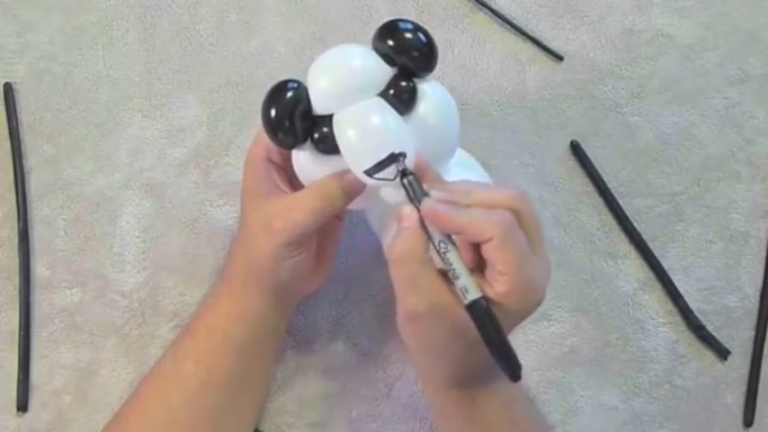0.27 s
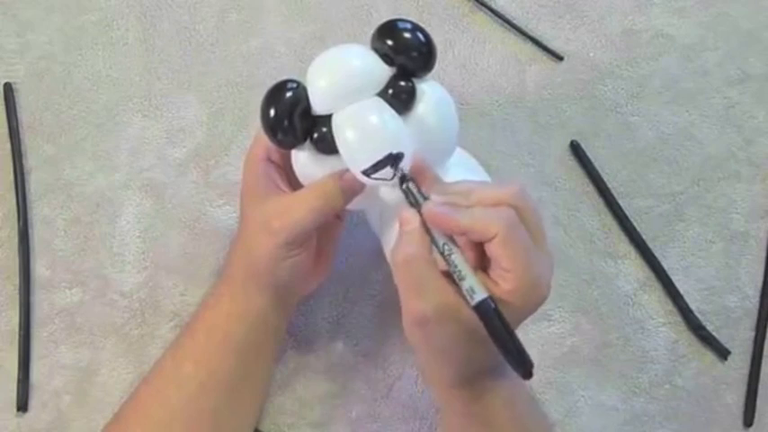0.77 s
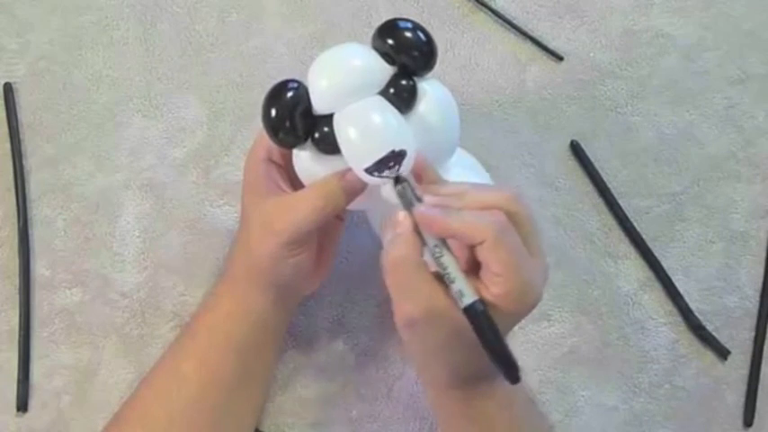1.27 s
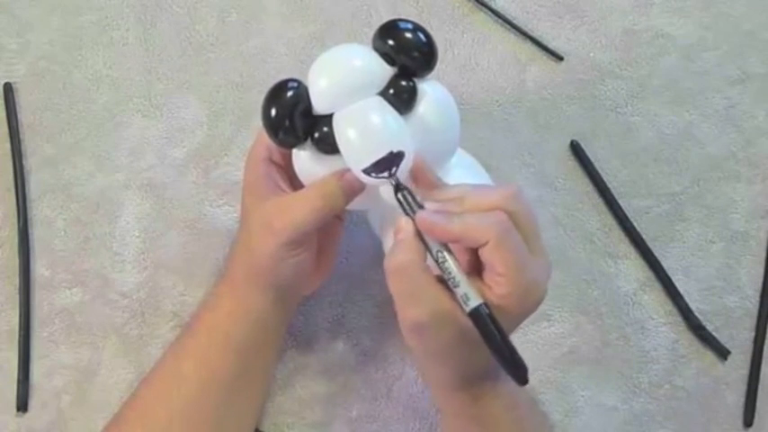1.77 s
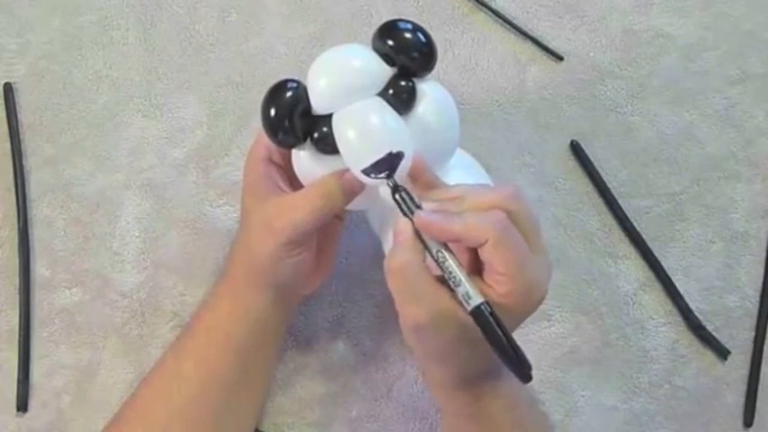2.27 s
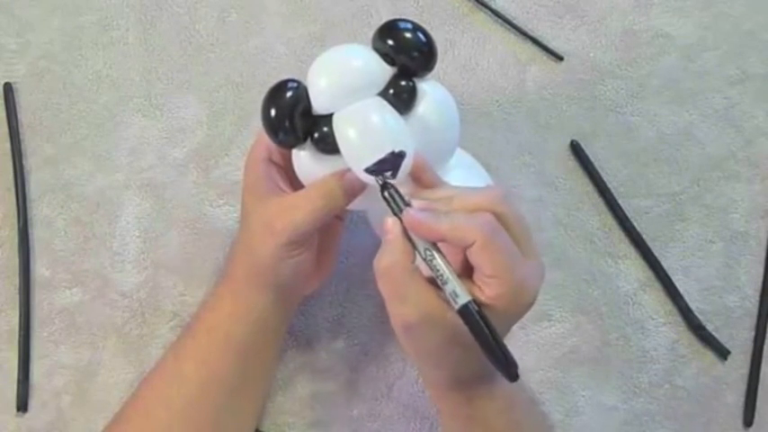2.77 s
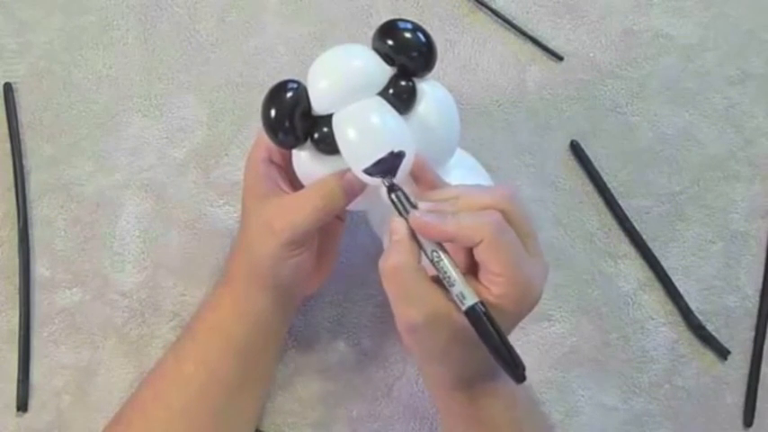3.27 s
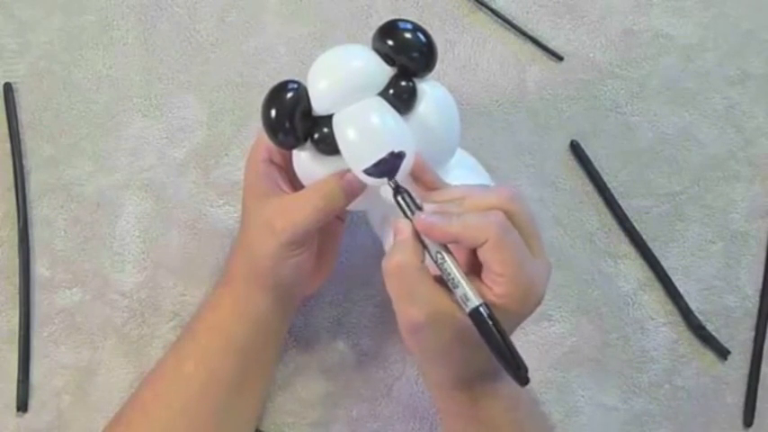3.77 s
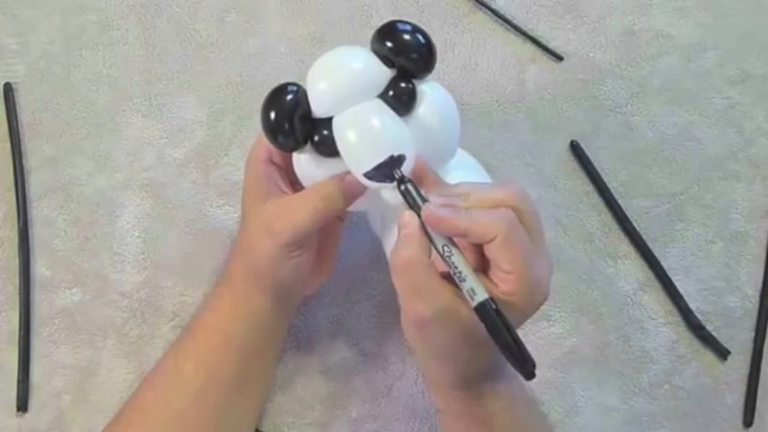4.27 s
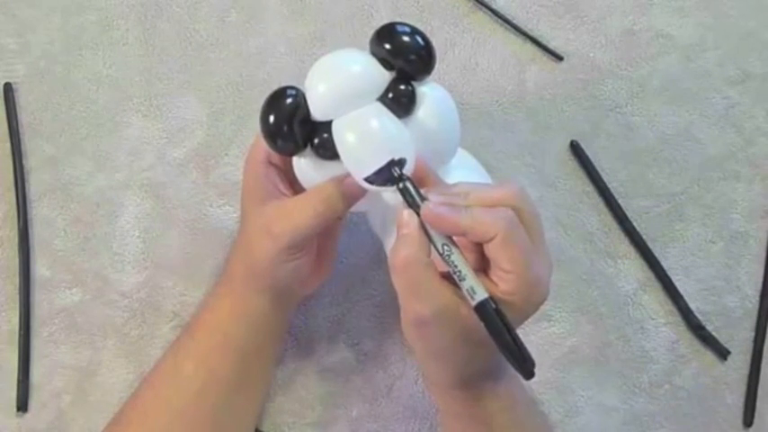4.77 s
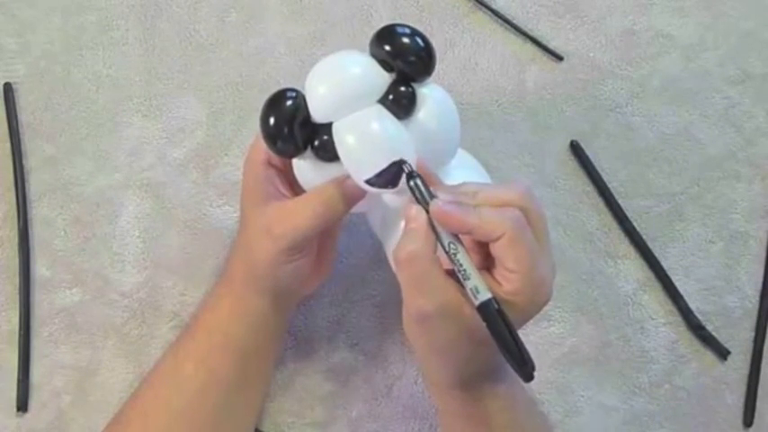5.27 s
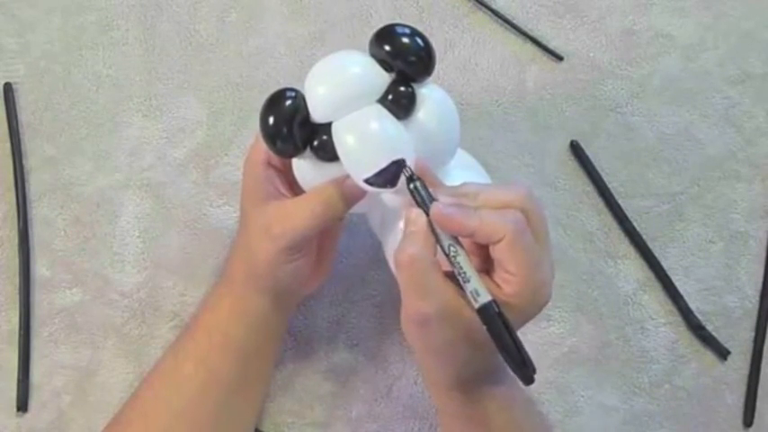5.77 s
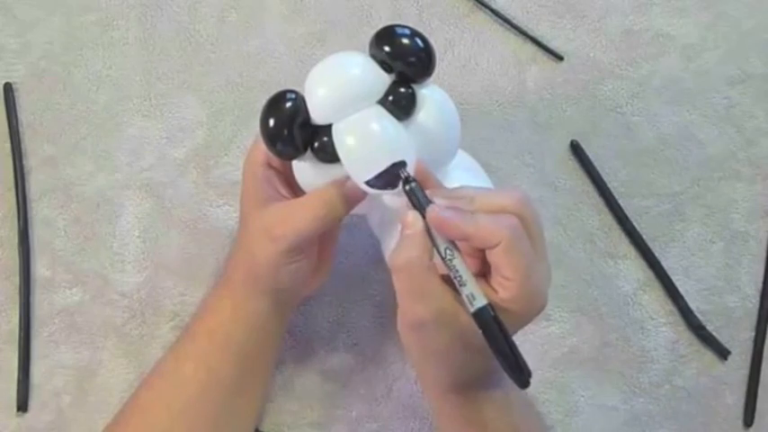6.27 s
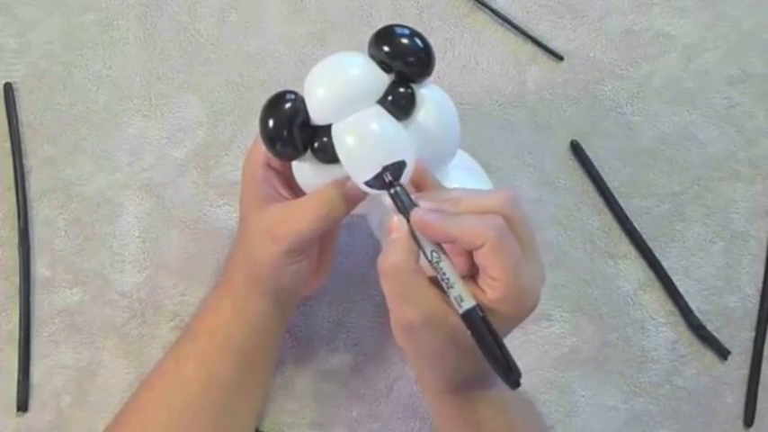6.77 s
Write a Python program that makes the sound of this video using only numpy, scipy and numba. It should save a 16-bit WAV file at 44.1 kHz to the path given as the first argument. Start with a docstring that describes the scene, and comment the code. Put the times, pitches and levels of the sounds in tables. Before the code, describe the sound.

Close up, a marker tip sticks and slips on a balloon in a rapid run of rubbery squeaks, each bending in pitch. The strokes sink into slower creaks, and the last three seconds hold mostly gentle wipes over wet ink and small, hollow taps on the skin. The microphone sounds slightly dull, and the small indoor room adds brief reflections and a faint, low hush.

```python
"""Felt marker on a balloon

Close up in a small room, on one narrow-band microphone: a marker colours a hand-held latex balloon.
The tip sticks and slips, ringing the skin and the air inside: slow slips creak, fast ones lock and squeak.
Each push is one arch of the hand, mostly loudest and purest at its crest, rougher as it lands and eases off.
Later, on the ink-wet patch, come mostly soft drags and ticks, with one faint falling chirp."""
import sys
import numpy as np
from scipy import signal
from scipy.fft import rfft, irfft, next_fast_len
from scipy.io import wavfile
from scipy.ndimage import uniform_filter1d, map_coordinates
from numba import njit

SR = 44100
rng = np.random.default_rng(int(sys.argv[2]) if len(sys.argv) > 2 else 0)


def dump_mix(stems):
    """Bounce the given channels to the path in sys.argv[1] as a 16-bit WAV at rate SR."""
    frames = np.atleast_2d(stems).T  # one column per channel
    limited = np.clip(frames, -1, 1)  # hard clip at full scale
    pcm = np.round(limited * 32767).astype(np.int16)
    wavfile.write(sys.argv[1], SR, pcm)


N = 309096
TIME = np.arange(N) / SR

# room tone spectrum: frequency_hz, relative_db
ROOM_TONE = [(20, -6), (50, -5.5), (120, 3.5), (200, 3.5), (450, -1.5), (900, -6), (3000, -17), (7000, -21),
             (8000, -48)]
# time the walls take to die away by 60 dB: frequency_hz, decay_s
ROOM_DECAY = [(200, 0.46), (1000, 0.31), (4000, 0.32), (8000, 0.18)]
# what the stretched skin radiates after one slip: frequency_hz, gain_db
SKIN_SPECTRUM = [(80, -54), (200, -19), (340, -5.5), (540, -7.5), (720, 2.5), (950, 0.5), (1400, -2.5),
                 (2100, -5.5), (3000, -8.5), (4100, -8.5), (6500, -19.5), (8000, -35)]
# modes of the skin under the tip: pitch_ratio, q, gain_db
PATCH_MODES = [(0.999, 5.1, -1), (2.298, 6.3, -13.5), (3.501, 12, -37)]
# resonances of the air inside the balloon: pitch_hz, over_skin_db
AIR_MODES = [(415, 4), (573, -19.5), (706, -6), (838, -1.5), (1175, -1.5), (1311, -14.5), (1402, -15.5),
             (1691, -0.5), (1872, -3), (2245, -0.5), (2826, 1.5)]
# dull colour of a wet tip letting go softly: frequency_hz, gain_db
WET_COLOUR = [(200, 0.5), (900, -2), (1400, -4), (2500, -8), (7000, -19.5)]
# colour of a touch, which also pushes the skin as a whole: frequency_hz, gain_db
TOUCH_COLOUR = [(150, 7), (400, 9), (900, 5), (3000, 6), (7000, 8)]
# wipes of the tip over wet ink: start_s, length_s, level_db
WET_WIPES = [(4.71, .016, -40), (4.845, 0.013, -35), (4.894, 0.044, -37), (4.94, 0.078, -40),
             (5.042, 0.03, -39.5), (5.082, 0.072, -36), (5.167, 0.064, -42.5), (5.548, 0.022, -52),
             (5.946, 0.054, -42.5), (6, 0.038, -33), (6.04, 0.093, -53), (6.145, 0.038, -43),
             (6.413, 0.12, -39.5), (6.676, 0.088, -44.5), (6.767, 0.047, -44), (6.814, 0.095, -43.5),
             (6.915, .1, -52)]
# single touches and releases of the tip: start_s, peak_db, relative_treble_db
TIP_TOUCHES = [(0.119, -16, -15), (1.081, -23, -13), (1.944, -21.5, -9), (2.238, -27, 2),
               (3.854, -24.5, -16.5), (3.881, -28, -13), (4.373, -23.5, -13.5), (4.568, -23, -10),
               (4.588, -25, -15.5), (4.625, -22.5, -9.5), (4.682, -28, -27), (4.715, -18.5, -14.5),
               (4.848, -24, -13.5), (5.295, -32.5, -17), (5.385, -31.5, -14), (5.399, -32, -16),
               (5.615, -29.5, -12), (5.782, -34.5, -12.5), (5.964, -37, 4), (5.979, -31.5, 8),
               (6.048, -28.5, -6), (6.089, -30.5, -24), (6.107, -29, -6), (6.146, -31, -15),
               (6.431, -29, -21), (6.519, -30.5, -18), (6.641, -34, -10), (6.699, -29.5, -10),
               (6.833, -27.5, -11), (6.897, -32.5, -2), (6.937, -32.5, -7), (6.979, -30, -6.5)]
# squeaks and creaks of the tip on latex: start_s, gather_s, ease_s, first_slip_hz, crest_slip_hz,
# last_slip_hz, crest_db, fade_db, crest_roughness (0-1), first_skin_hz, last_skin_hz
SQUEAK_STROKES = [ (0.0, .039, 0.015, 576, 701.3, 663, -22, 6, .05, 1150, 620),
                  (0.068, 0.022, .012, 677, 677, 680, -33, 4, 0.3, 800, 640),
                  (0.134, .08, .048, 614.3, 573.5, 489, -24, 4.5, 0.15, 1300, 1290),
                  (0.262, .01, .025, 459, 438.4, 390, -26.5, 2.5, 0, 950, 850),
                  (0.295, .035, 0.041, 304, 311.3, 282, -29.5, 9, 0.14, 1100, 980),
                  (0.443, 0.011, 0.0074, 299, 398, 444, -30.5, -1.5, 0.4, 1390, 1340),
                  (0.46, .022, .046, 537, 725.6, 422, -23, 7.5, .25, 1380, 1123),
                  (0.569, 0.015, 0.013, 680, 712, 680, -23, 9, .2, 1350, 1240),
                  (0.595, 0.0051, 0.056, 640, 634.7, 607, -25, 12.5, 0.1, 1100, 900),
                  (0.692, 0.056, .034, 588.4, 682, 398, -24.5, 5, 0.08, 1300, 1050),
                  (0.818, 0.02, 0.043, 590, 749, 635, -24, 14, .25, 1480, 1260),
                  (0.902, 0.023, 0.013, 653, 721, 627, -24, 6, 0.4, 1325, 1375),
                  (0.939, 0.032, 0.045, 600, 670, 591, -22, 8, 0.14, 1230, 1250),
                  (1.099, .02, 0.059, 440, 790, 396, -26.5, 10, 0.7, 1400, 980),
                  (1.225, 0.025, 0.0087, 362, 490, 514, -24.5, -3, 0.1, 1310, 1410),
                  (1.255, 0.036, .034, 609, 688.7, 559, -22.5, 6, 0.12, 1243, 1163),
                  (1.33, .04, 0.013, 293, 197.6, 185, -32, 2.5, 0.7, 1150, 1026),
                  (1.439, 0.013, .03, 383.6, 465, 517, -28.5, -5, 0.3, 1020, 1185),
                  (1.483, .024, 0.043, 588, 653.6, 505, -21.5, 16.5, 0, 1320, 1290),
                  (1.573, .032, .047, 437, 659.5, 332, -24, 5, 0.27, 1220, 1030),
                  (1.689, .04, 0.034, 299.5, 589.5, 303.7, -22, 10, .2, 1450, 1140),
                  (1.811, .032, .038, 578, 729.7, 628, -21, 11.5, 0.3, 1550, 855),
                  (2.001, 0.042, 0.049, 397.3, 663, 290, -22, 5, .08, 1340, 1300),
                  (2.238, .003, 0.012, 419, 424, 250, -28.5, 7, 0.8, 1430, 1340),
                  (2.293, 0.021, 0.079, 373, 549, 622, -28, 5.5, .5, 1280, 1330),
                  (2.394, .02, 0.084, 398, 379.8, 204, -30, 3, 0.8, 1060, 1120),
                  (2.639, .037, 0.037, 237.4, 396.8, 301, -31, 3, 0.3, 1280, 964),
                  (2.766, .022, .012, 336.6, 407, 497, -30, -1, 0.7, 1000, 1050),
                  (2.803, .01, .036, 569, 590.4, 556, -26, -1, 0.1, 1170, 1210),
                  (2.85, .016, .013, 557, 584, 547, -21.5, 4.5, 0, 1230, 1170),
                  (2.878, .006, .04, 458, 405.6, 277, -22.5, 10.5, 0.4, 1050, 1180),
                  (2.999, 0.014, 0.049, 456, 647, 369, -25, 9.5, .3, 1170, 1160),
                  (3.097, 0.0079, .014, 380, 478, 456, -29, -1, 0.4, 1020, 1080),
                  (3.122, .01, .062, 436, 415, 129.5, -24.5, 6, 0.5, 860, 990),
                  (3.201, 0.031, 0.033, 304, 333, 321.4, -29, -1, .7, 1480, 1210),
                  (3.268, .024, .023, 524.4, 610, 379, -23, 5.5, .3, 1050, 1140),
                  (3.315, 0.008, 0.055, 397.5, 392, 200.2, -31.5, 1.5, .6, 1160, 1014),
                  (3.58, .003, 0.033, 318, 301.7, 306.4, -30, 2.5, 0.1, 1400, 1390),
                  (3.613, .02, 0.047, 403, 477, 259.7, -30.5, 3, 0.23, 1200, 980),
                  (3.672, .028, 0.032, 218.6, 151, 114.4, -33, 5.5, .35, 1280, 980),
                  (3.899, .027, 0.05, 96.8, 192.3, 90, -29.5, 7, .4, 980, 1030),
                  (3.987, .047, .006, 120.2, 221.3, 231, -30, -6, 0.3, 1000, 1200),
                  (4.043, .055, 0.071, 245.7, 427, 447, -25, 10, 0.3, 1370, 1330),
                  (4.178, .016, 0.023, 391, 568.4, 738, -39, 8, .3, 1140, 1230),
                  (4.682, 0.018, 0.036, 249.3, 238.6, 205, -38.5, 6, .6, 1300, 1250),
                  (5.904, 0.014, 0.013, 650, 591, 374, -42.5, -1, 0.18, 1300, 950), ]


def amp(db):
    """Decibels to gain."""
    return 10 ** (np.asarray(db) / 20)


def unit(x):
    """Scale to rms 1."""
    return x / np.sqrt(np.mean(x ** 2) + 1e-20)


def along(points, hz):
    """Read (frequency_hz, value) points on a log axis."""
    frequencies, values = np.transpose(points)
    return np.interp(np.log(hz + 1), np.log(frequencies), values)


def filtered(x, response):
    """Shape x by a gain that depends on frequency."""
    size = next_fast_len(len(x) + SR // 20)
    return irfft(rfft(x, size) * response(np.fft.rfftfreq(size, 1 / SR)), size)[:len(x)]


def through(x, response):
    """Play x through an impulse response."""
    return signal.fftconvolve(x, response)[:len(x)]


def pulses(times, sizes, count):
    """Band-limited impulses placed between samples."""
    at = times[:, None] * SR
    taps = np.floor(at).astype(int) + np.arange(-7, 9)
    shape = np.sinc(taps - at) * np.cos(np.pi * (taps - at) / 16) ** 2
    return np.bincount(np.clip(taps, 0, count - 1).ravel(), (sizes[:, None] * shape).ravel(), count)


def treble(hz, corner_hz=2300):
    """A weight rising from 0 to 1 around the corner."""
    return 1 - 1 / (1 + (hz / corner_hz) ** 4)


def room_tone(level_db=-52.5):
    """The steady low noise of the still room, behind everything."""
    noise = filtered(rng.standard_normal(N), lambda hz: amp(along(ROOM_TONE, hz)))
    return amp(level_db) * unit(noise)


def wall_reflections(x, wet_db=-9, predelay_s=.004):
    """Near walls answer just after the direct sound, each frequency dying at its own speed."""
    hz, t, spectrum = signal.stft(rng.standard_normal(SR // 2), SR, nperseg=256)
    decay = amp(-60 * t / along(ROOM_DECAY, hz)[:, None])
    tail = signal.istft(spectrum * decay, SR, nperseg=256)[1]
    tail /= np.linalg.norm(tail)
    return amp(wet_db) * through(x, np.pad(tail, (int(predelay_s * SR), 0)))


def balloon_body(contact_db, air_width_hz=33, ripple_delay_s=.00181, size=4096):
    """The answer to one slip: the contact's colour, the damped skin and the ringing air inside."""
    hz = np.fft.rfftfreq(size, 1 / SR)
    cepstrum = irfft(np.log(amp(along(SKIN_SPECTRUM, hz) + contact_db(hz))))
    cepstrum[1:size // 2] *= 2  # causal: nothing sounds before the slip
    cepstrum[size // 2 + 1:] = 0
    skin = np.exp(rfft(cepstrum))
    loss = 1j * hz * air_width_hz
    air = sum(amp(db) * loss / (pitch_hz ** 2 - hz ** 2 + loss) for pitch_hz, db in AIR_MODES)
    # long ripples drag more air and run slower, so the low notes of a slip arrive last
    delay_s = ripple_delay_s / (1 + hz / 2200)
    lag = np.exp(-2j * np.pi * np.cumsum(delay_s) * SR / size)
    return irfft(skin * (1 + air) * lag)


@njit
def resonate(x, step, damping):
    """A resonator with gain 1 at its peak, which moves with step (radians per sample)."""
    out = np.zeros(len(x))
    place = speed = 0.0
    for i in range(len(x)):
        speed += step[i] * (damping * (x[i] - speed) - place)
        place += step[i] * speed
        out[i] = speed
    return out


def skin_patch(force, skin_hz, direct=.76, slack_hz=1200, focus=10.5):
    """The skin under the tip rings at a note that follows its tension; taut skin rings more purely."""
    skin_hz = np.clip(skin_hz, 500, 1900)
    step = 2 * np.pi * skin_hz / SR
    ring = sum(amp(db) * resonate(force, step * ratio, 1 / q) for ratio, q, db in PATCH_MODES)
    slackness = np.minimum(slack_hz / skin_hz, 1) ** focus
    return ring + direct * slackness * force  # slack skin also passes the raw slip on


def skin_ripples(force, share=.94, life_s=.0052, renew_s=.036, corner_hz=1500, size=500):
    """Short ripples return from around the balloon, by paths that change as the tip travels."""
    t = np.arange(len(force)) / SR
    renewals = np.arange(int(t[-1] / renew_s) + 2) * renew_s
    paths = rng.standard_normal((64, size))[:len(renewals)]
    paths *= np.exp(-np.arange(size) / SR / life_s)
    paths /= np.linalg.norm(paths, axis=1, keepdims=True)
    paths = signal.lfilter(*signal.butter(2, corner_hz, "high", fs=SR), paths)
    crossfades = np.sqrt(np.clip(1 - np.abs(t - renewals[:, None]) / renew_s, 0, 1))
    returns = signal.fftconvolve(force * crossfades, paths, axes=1).sum(0)
    return force + share * returns[:len(force)]


def wet_drag(slip_hz=400, drift=.12, jitter=.14, scatter_db=4, skin_hz=1020, wander=.13, arch=.38):
    """On wet ink the slips are small, dull and loosely spaced; each wipe swells and fades."""
    strength = np.zeros(N)
    for start_s, length_s, level_db in WET_WIPES:
        progress = np.clip((TIME - start_s) / length_s, 0, 1)
        strength += amp(level_db) * np.abs(np.sin(np.pi * progress)) ** arch
    knots = np.linspace(0, TIME[-1], 250)
    speed = np.interp(TIME, knots, rng.standard_normal(len(knots)))
    tension = np.interp(TIME, knots, rng.standard_normal(len(knots)))
    cycles = np.cumsum(slip_hz * np.exp(drift * speed)) / SR
    slips = np.arange(int(cycles[-1]))
    time_scatter, size_scatter = rng.standard_normal((5000, 2))[:len(slips)].T
    slip_times = np.interp(slips + jitter * time_scatter, cycles, TIME)
    force = pulses(slip_times, amp(scatter_db * size_scatter), N)
    force = skin_patch(force, skin_hz * np.exp(wander * tension), direct=.77)
    body = balloon_body(lambda hz: along(WET_COLOUR, hz))
    return through(force * strength, body) / np.std(through(force, body))


def tip_ticks(sharp_db=12, flutter=.17, flutter_s=.0021, skin_hz=1250, lag_s=.00063):
    """Each touch snaps the skin once; ripples run on over it for a few milliseconds."""
    out, t = np.zeros(N + SR), np.arange(SR // 5) / SR
    for start_s, peak_db, treble_db in TIP_TOUCHES:
        force = flutter * rng.standard_normal(len(t)) * np.exp(-t / flutter_s)
        force[0] = 1  # the snap
        force = skin_patch(force, np.full(len(t), skin_hz), direct=1.0)
        body = balloon_body(lambda hz: along(TOUCH_COLOUR, hz) + (treble_db + sharp_db) * treble(hz))
        tick = through(force, body)
        out[round((start_s + lag_s) * SR):][:len(t)] += amp(peak_db) * tick / np.abs(tick).max()
    return out[:N]


def hand_arch(t, stroke, landing_db=3.5, db_per_octave=2, landing_rough=.2, easing_rough=.5):
    """One push sets slip rate, level and roughness: fast slips are louder, a light tip loses its lock."""
    gather_s, ease_s, first_hz, crest_hz, last_hz, crest_db, fade_db, crest_rough, *_ = stroke
    gathering = t < gather_s
    from_crest = np.interp(t, [0, gather_s, gather_s + ease_s], [1, 0, 1])
    glide = from_crest ** np.where(gathering, 1.4, 1.8)  # higher powers flatten the crest
    slip_hz = crest_hz + (np.where(gathering, first_hz, last_hz) - crest_hz) * glide
    lightness = from_crest ** .91
    level_db = crest_db + db_per_octave * np.log2(slip_hz / crest_hz)
    level_db -= np.where(gathering, landing_db, fade_db) * lightness
    rough = crest_rough + np.where(gathering, landing_rough, easing_rough) * lightness
    return slip_hz, level_db, np.clip(rough, 0, 1)


def squeak(stroke, body, jitter=.072, scatter_db=3, rub=.55, waver=.025, bite=.57, firm_db=-27):
    """One train of slips: regular when locked to the skin, scattered in time and size when rough."""
    gather_s, ease_s, *_, first_skin_hz, last_skin_hz = stroke
    length_s = gather_s + ease_s
    t = np.arange(int((length_s + .08) * SR)) / SR  # with time to ring out
    moving = t <= length_s
    slip_hz, level_db, rough = hand_arch(t, stroke)
    unsteady = map_coordinates(rng.standard_normal(200), [t * 130], mode="mirror")  # 130 values a second
    cycles = np.cumsum(slip_hz * (1 + waver * rough * unsteady)) / SR
    slips = np.arange(int(cycles[moving][-1]) + 1)
    disorder = np.interp(slips, cycles, rough)
    time_scatter, size_scatter = rng.standard_normal((200, 2))[:len(slips)].T
    slip_times = np.interp(slips + jitter * disorder * time_scatter, cycles, t)
    slip_times = np.minimum(slip_times, length_s - .002)  # the last slip comes before the tip stops
    force = pulses(slip_times + .0003, amp(scatter_db * disorder * size_scatter), len(t))
    # the felt's fibres rasp while the tip slides, just after each slip
    sliding = unit(np.exp(-3 * (cycles % 1)) * moving)
    rasp = sliding * rng.standard_normal(SR // 2)[:len(t)]
    force += rub * rough * np.sqrt(np.gradient(cycles)) * rasp
    # a firmer tip lets go more sharply
    force += (amp(bite * (level_db - firm_db)) - 1) * filtered(force, treble)
    skin_hz = np.interp(t, [0, length_s], [first_skin_hz, last_skin_hz])
    force = skin_patch(skin_ripples(force), skin_hz)
    # the hand's pressure sets the loudness, whichever resonance the slips hit
    power = uniform_filter1d(through(force, body)[moving] ** 2, size=700)
    pressure = amp(level_db) / np.sqrt(np.interp(t, t[moving], np.abs(power)) + 1e-12)
    return through(force * pressure, body)


def marker_squeaks():
    """In the foreground, stroke after stroke sticks and slips on the latex."""
    out, body = np.zeros(N + SR), balloon_body(contact_db=np.zeros_like)
    for start_s, *stroke in SQUEAK_STROKES:
        sound = squeak(stroke, body)
        out[round(start_s * SR):][:len(sound)] += sound
    return out[:N]


def scene():
    """Marker and balloon close to the microphone, the room behind them."""
    marker = marker_squeaks() + wet_drag() + tip_ticks()
    return (marker + wall_reflections(marker) + room_tone())[None]


def record(dry, corner_hz=7550, stop_hz=8200, offset=.0153):
    """One narrow-band microphone whose output rests a little above zero."""
    mono = filtered(dry[0], lambda hz: (hz < stop_hz) / np.sqrt(1 + (hz / corner_hz) ** 70))
    return mono[None] + offset


dry = scene()
out = record(dry)
dump_mix(out)
```